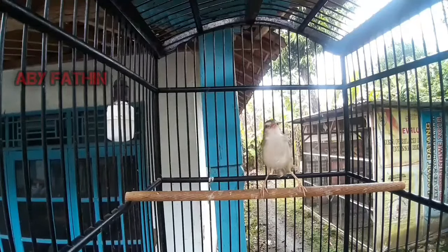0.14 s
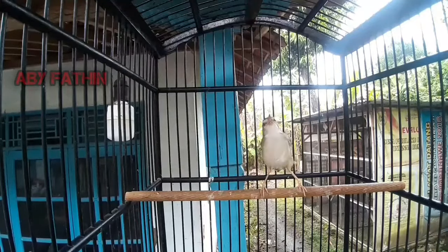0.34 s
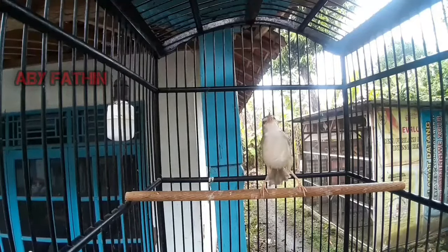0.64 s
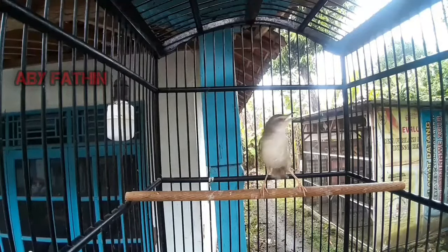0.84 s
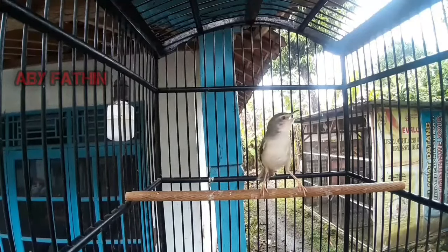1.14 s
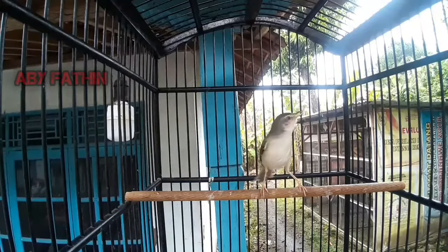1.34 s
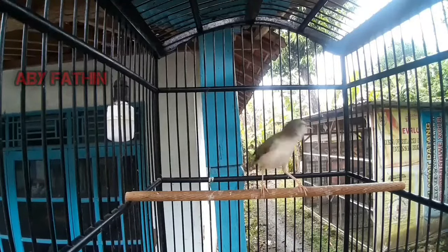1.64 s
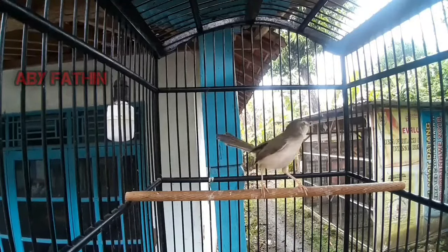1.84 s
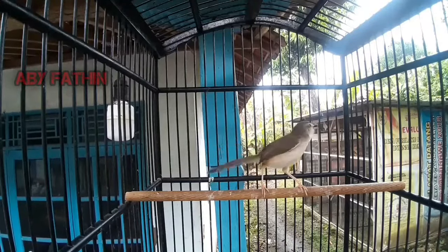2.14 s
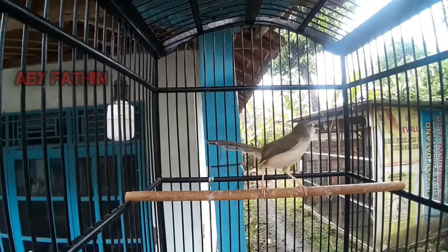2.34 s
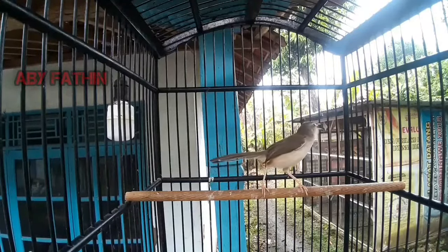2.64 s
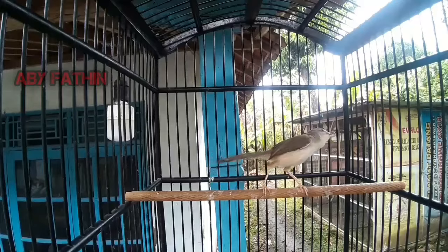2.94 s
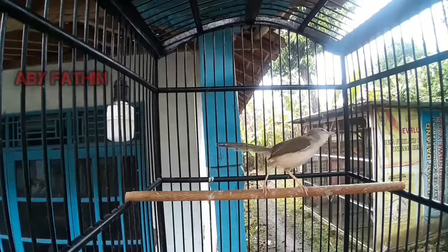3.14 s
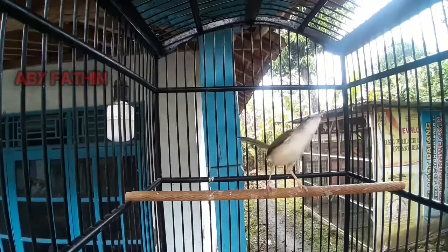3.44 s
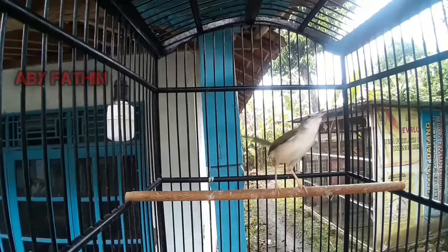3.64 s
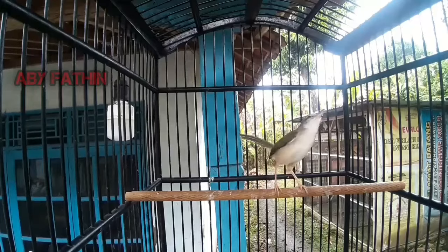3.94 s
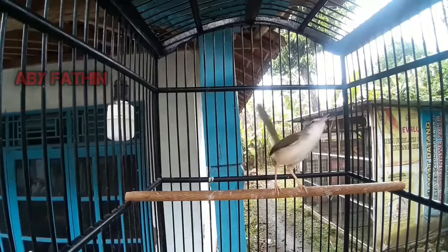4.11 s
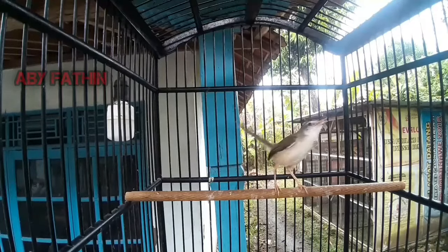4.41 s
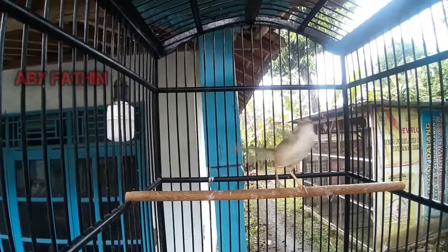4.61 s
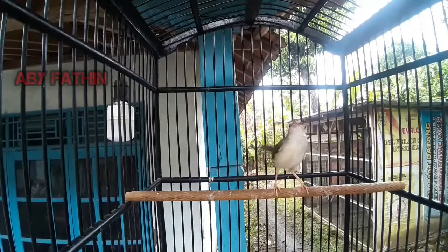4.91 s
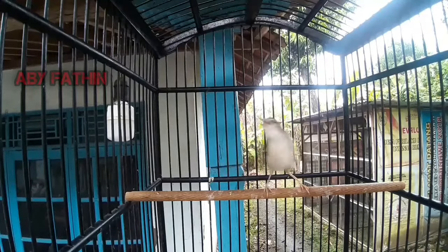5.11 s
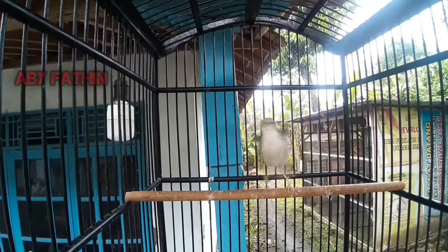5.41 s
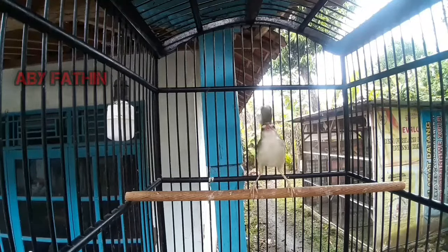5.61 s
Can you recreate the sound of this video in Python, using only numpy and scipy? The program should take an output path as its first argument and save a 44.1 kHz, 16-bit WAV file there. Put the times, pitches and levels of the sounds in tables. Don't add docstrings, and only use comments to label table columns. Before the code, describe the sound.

A small bird in a wire cage, an arm's length from a stereo microphone, repeats short dry rattles: three to five hard clicks joined by tiny arched whistles and beak hiss. About six or seven calls come each second. They soften towards three seconds, pause briefly while a faint distant bird whistles, then resume and grow strong again. Light yard echo and very low traffic rumble lie behind; cage wire tings faintly near the end.

```python
import sys
import numpy as np
from scipy import signal
from scipy.fft import rfft, irfft
from scipy.io import wavfile
from scipy.ndimage import uniform_filter1d

SR = 44100
rng = np.random.default_rng(int(sys.argv[2]) if len(sys.argv) > 2 else 0)


def generate_wav(sig):
    pcm = np.round(np.clip(np.atleast_2d(sig).T, -1, 1) * 32767).astype(np.int16)
    wavfile.write(sys.argv[1], SR, pcm)


def how_loud(loudness_db):
    steps = np.asarray(loudness_db, float) / 20
    return 10 ** steps


N = 254016
LEAD = 2048
CALL = 7168

# first_click_s, last_full_click_s, closing_click_s,
# click_effort_db, closing_click_over_effort_db
CALLS = [(-.024, .0378, .066, -13.8, -28), (.135, .1769, .203, -14.2, -2),
         (.2977, .3632, .3826, -14.5, -5), (.4684, .4858, .5095, -14.6, -1),
         (.5936, .6324, .6529, -15.3, -10), (.7537, .792, .8166, -12.5, -2),
         (.9158, .9538, .9784, -15.3, -1), (1.0782, 1.1427, 1.1628, -16.4, -19),
         (1.2451, 1.3072, 1.333, -14.5, -30), (1.4472, 1.5108, 1.5285, -17.6, -9),
         (1.6183, 1.6799, 1.6985, -15.8, -12), (1.7734, 1.8131, 1.8343, -20, -11),
         (1.9214, 1.9581, 1.9799, -20.8, -6), (2.06, 2.0985, 2.1233, -22.5, -4),
         (2.2118, 2.2506, 2.276, -20.5, -5), (2.3622, 2.402, 2.4248, -24, -5),
         (2.5015, 2.539, 2.5634, -22.5, -4), (2.6575, 2.6968, 2.7207, -22.1, -14),
         (2.7949, 2.838, 2.8582, -26.5, -7), (2.9481, 3.0131, 3.0314, -26, -6),
         (3.337, 3.3951, 3.414, -18, -9), (3.5968, 3.6788, 3.6989, -17.5, -18),
              (3.9821, 4.0394, 4.0576, -18.4, -15), (4.149, 4.209, 4.2287, -17.8, -8),
              (4.3179, 4.3554, 4.3778, -18.6, -10), (4.4618, 4.5002, 4.5232, -18.2, -10),
              (4.6086, 4.6463, 4.671, -14.3, -5), (4.7532, 4.7917, 4.8162, -13.8, -7),
              (4.9073, 4.9704, 4.9882, -13.9, -17), (5.065, 5.1029, 5.1267, -11.9, -5),
              (5.2279, 5.2871, 5.311, -14.7, -12), (5.4125, 5.4719, 5.4893, -12.8, -20),
              (5.5667, 5.6293, 5.6512, -14.8, -5), (5.738, 5.7558, 5.777, -21, -8)]
# start_s, top_pitch_hz, whistle_over_click_db, second_partial_over_mean_arch_db, left_lag_us
HEAD_TURNS = [(0, 2841, -13, 4.5, -42), (.3, 2782, -12.5, 8, -37), (0.469, 2918, -15, 4.5, -49),
              (0.601, 2733, -12, 9, -37), (.8, 2800, -14.5, 7, -37), (0.919, 2747, -13.5, 6, 28),
              (1.5, 2780, -10.5, 5, 18), (1.8, 2755, -12, 3, 65.5), (2.362, 2840, -9.5, 4, 66.5),
              (2.55, 2815, -14, -0.5, 72), (2.8, 2610, -10.5, 7, 75), (2.951, 2720, -11, 6, 89.5),
              (3.34, 2704, -11, 2.5, 53), (4.46, 2690, -7.5, -0.5, 46.5), (4.75, 2773, -12.5, 4.5, 19),
              (5.07, 2706, -13, 7, -4), (5.23, 2742, -14, 8, -43), (5.76, 2742, -8.5, 6, -52)]
# gap_to_next_click_ms, click_db,
# arch_top_ms, top_pitch_share, arch_db, end_pitch_share_of_top
CYCLES = [
    (17.55, -7, 9.8, .87, -7.5, .81),
    (20.58, 1, 12.26, 0.96, -1.5, .77),
    (24.17, 1, 14.12, 0.99, -3, .75),
    (23.75, 1, 12.9, 0.97, -5.5, .74),
    (24.5, -0.5, 12.63, 0.97, -13.5, .74),
]
# pitch_hz, level_db
TRACT = [(1500, -1.5), (2200, 0), (2800, 2.5), (4300, 4.5), (5000, -1.5), (5600, 4.5), (7000, -6.5),
         (9000, -3.5), (14000, -9)]
OVERTONES = [-6, -29.5, -16.5, -24.5]
# pitch_hz, level_db
BREATH = [(1000, -18.5), (1350, -8), (1700, -12.5), (3300, 1), (4200, 5), (5900, -10.5), (8000, -8),
          (10500, -14), (12500, -20.5), (14500, -29), (15800, -40.5)]
# pitch_hz, level_db
LOW_END = [(600, -36.5), (1250, -8), (1900, -1.5)]
# pitch_hz, level_db_per_us of lag
TURNED_AWAY = [(3000, 0), (4300, 0.0121), (5500, 0.1061), (6500, -0.0004)]
# pitch_hz, t60_s
YARD_DECAY = [(2500, 0.47), (4500, 0.4), (8000, 0.88), (14000, 0.9)]
# peak_s, ring_hz, level_db, swell_ms
WIRE = [(5.66, 9920, -45, 5.5), (5.68, 7840, -35.5, 7.8), (5.685, 10070, -54, 6.8),
        (5.694, 8850, -51.5, 5.5), (5.701, 10300, -54, 5), (5.711, 8100, -50, 6), (5.724, 8980, -42.5, 13),
        (5.742, 7250, -45, 3.8)]
# peak_s, centre_hz, level_db, length_ms
THUDS = [(.16, 653, -62, 32), (2.45, 630, -71.5, 120), (3.17, 75, -53.5, 40), (4.18, 650, -62.5, 65),
         (4.63, 800, -67.5, 97), (5.27, 66.4, -63, 58)]
# start_s, length_s, start_hz, end_hz, level_db, waver_hz
FAR_BIRD = [(3.115, .07, 4560, 4400, -54, 25), (3.185, .05, 4420, 4330, -58, 40),
            (3.19, .11, 4250, 4000, -65, 220), (3.535, .04, 2330, 2380, -71, 20),
            (3.25, .07, 2350, 2330, -72, 40)]
# pitch_hz, level_db per Hz
FLOOR = [(30, -58), (48, -21), (70, -3.5), (110, 0.5), (250, -8), (500, -16), (900, -27), (2200, -27),
         (5000, -36), (15000, -41.5)]
# pitch_hz, likeness (0 to 1)
SAME = [(30, 1), (125, 0.92), (250, 0.84), (500, 0.3), (1500, .2), (9000, .1)]
# time_s, level_db
RUMBLE = [(0, -1), (3.7, -0.5), (5, 2.5), (5.76, 2)]

FLOOR_DB = -60
WHOLE_MS, CUT_MS = 23.2, 20.5
CUT_SAG, CUT_PITCH, CUT_DB = 0.85, 0.97, -1.5
FADED_DB, FADED_CUT = -14, 0.63
SCATTER_DB, SCATTER_PITCH = .9, .012
LINGER_S = 0.00435
PAN_DB, PAN_DB_PER_US = 1.1, .022
PATCHY_DB, PATCHY_HZ = 5.5, 8000
TRAY_S, TRAY_DB = .0032, -20


def evened(x):
    return x / np.sqrt(np.mean(x ** 2) + 1e-20)


def read(points, hz):
    f, value = np.transpose(points)
    return np.interp(np.log(hz + 1), np.log(f + 1), value)


def add(mix, s, sound):
    part = mix[..., round(s * SR) + LEAD:][..., :sound.shape[-1]]
    part += sound[..., :part.shape[-1]]


def coloured(x, points):
    hz = np.fft.rfftfreq(len(x), 1 / SR)
    return irfft(rfft(x) * how_loud(read(points, hz)), len(x))


def bump(t, width):
    return np.exp(-.5 * (t / width) ** 2)


def rattle(rows, bright_db, pan_db, lag_us):
    t = rows[0][0] - .02 + np.arange(CALL) / SR
    voice = sum(click(t - row[0], row[1], 4300 if k else 4150) for k, row in enumerate(rows))
    air = sum(how_loud(row[1] - 16.5) * bump(t - row[0], .0022) for row in rows)
    second_db = bright_db + np.mean([row[4] for row in rows[:-1]])
    for k, (row, after) in enumerate(zip(rows, rows[1:])):
        start = round((row[0] - t[0]) * SR)
        span = slice(start, start + CALL // 4)
        end = after[0] + LINGER_S * (len(after) == 2)
        over_db = second_db - row[4] - 28 * max(row[5] - .87, 0) + (.4 if k else -4.2)
        tone, effort = arch(t[span], row[0], end, *row[2:], over_db, gap=.0042 if k else .0063)
        voice[span] += tone
        air[span] += how_loud(-6.5) * effort
    shared, left, right = rng.standard_normal((3, CALL))
    puff = evened(coloured(shared, [(2400, -15), (3900, -0.5), (5200, -11), (9000, -48.5)]))
    voice += how_loud(rows[1][1] - 21) * bump(t - rows[0][0] + 0.0069, 0.0041) * puff
    gusts = evened(uniform_filter1d(rng.standard_normal(CALL), 90))
    air *= how_loud(3.5 * gusts - 1.2 + 0.037 * max(lag_us, 0))
    breath = np.array([evened(coloured(shared + 1.3 * own, BREATH)) for own in (left, right)])
    return t[0], at_ports(voice + air * breath, pan_db, lag_us)


def cycles(first, last, close, effort_db, close_db, top_hz, whistle_db):
    reach = np.cumsum([0] + [c[0] / 1000 for c in CYCLES[:-1]])
    count = np.argmin(abs(reach - (last - first)))
    stretch = (last - first) / reach[count]
    shortness = (WHOLE_MS - 1000 * (close - last)) / (WHOLE_MS - CUT_MS)
    cut = np.clip(shortness, FADED_CUT * (close_db <= FADED_DB), 1)
    chance, rows = rng.standard_normal((len(CYCLES), 3)), []
    for k, (_, click_db, top_ms, share, db, sag) in enumerate(CYCLES[:count + 1]):
        broken = cut * (k == count)
        pitch = top_hz * share * (1 - broken * (1 - CUT_PITCH) + SCATTER_PITCH * chance[k, 1])
        rows.append((first + stretch * reach[k],
                     effort_db + click_db + SCATTER_DB * chance[k, 0],
                     top_ms * stretch,
                     pitch,
                     effort_db + whistle_db + db + broken * CUT_DB + SCATTER_DB * chance[k, 2],
                     sag + broken * (CUT_SAG - sag)))
    return rows + [(close, effort_db + close_db)]


def click(t, db, hz):
    hz = hz * (1 + .025 * rng.standard_normal())
    phase = 2 * np.pi * rng.random()
    ring = bump(t, 0.00094) * np.sin(2 * np.pi * (hz * t + 193000.0 * t ** 2) + phase)
    sweep_turns = 5600 * (t + 0.00084) + 1245000.0 * (t + 0.000797) ** 2
    sweep = bump(t + 0.0017, 0.00047) * np.sin(2 * np.pi * sweep_turns)
    return np.sqrt(2) * how_loud(db) * (ring + how_loud(-21.5) * sweep)


def arch(t, click_s, end, top_ms, top_hz, db, sag, bright_db, gap):
    top, start, stop = click_s + top_ms / 1000, click_s + gap, end - .002
    rise = np.clip((top - t) / max(top - start, .002), 0, 1.3)
    fall = np.clip((t - top) / max(stop - top - .0015, .002), 0, 1.05)
    linger = np.clip((sag - .85) / 0.2, 0, 1)
    slump = 0.21 * linger * np.clip((t - stop + 0.00033) / 0.0046, 0, 1)
    stop += 0.0022 * linger
    flutter = evened(uniform_filter1d(rng.standard_normal((len(t), 2)), 40, axis=0))
    droop = (1.02 - sag) * fall ** 1.65 + slump
    hz = top_hz * (1 - 0.26 * rise ** 1.733 - droop + .01 * flutter[:, 0])
    gate = np.clip((t - start) / 0.001, 0, 1) * np.clip((stop - t) / 0.0054 + .5, 0, 1)
    effort = gate * how_loud(db - 7.5 * rise ** 1.8 - 1.07 * fall ** 2.1 - 150 * slump)
    turn = 2 * np.pi * (np.cumsum(hz) / SR + rng.random())
    tone = how_loud(read(TRACT, hz) - read(TRACT, top_hz)) * np.sin(turn)
    for k, over_db in enumerate([bright_db] + OVERTONES, 2):
        partial_db = over_db + read(TRACT, k * hz) + 2.62 * flutter[:, 1]
        tone += how_loud(partial_db) * np.sin(k * turn + k)
    return np.sqrt(2) * effort * tone, effort


def at_ports(sound, pan_db, lag_us):
    hz, side = np.fft.rfftfreq(CALL, 1 / SR), np.array([[.5], [-.5]])
    bands = evened(uniform_filter1d(rng.standard_normal(len(hz)), size=120))
    patchy_db = PATCHY_DB * bands * np.clip(hz / PATCHY_HZ - 1, 0, .3) / 0.4
    shade_db = read(LOW_END, hz) + read(TURNED_AWAY, hz) * max(lag_us, 0) + patchy_db
    level_db = side * pan_db * (hz < PATCHY_HZ) + shade_db
    delay = np.exp(-2j * np.pi * np.minimum(hz, 6000) * side * lag_us * 1e-6)
    ports = irfft(rfft(sound) * how_loud(level_db) * delay, CALL)
    return ports / np.cos(np.pi * 4200 * lag_us * 1e-6) ** 0.88


def yard(x, near_db):
    t = np.arange(1024) / SR
    near = rng.standard_normal((2, 1024)) * how_loud(-60 * t / 0.03) * (t > .0012)
    taps, slots = np.zeros((2, SR)), np.arange(500, SR - 20, 20)
    at = slots + rng.integers(0, 20, (2, len(slots)))
    np.put_along_axis(taps, at, rng.choice([-1., 1.], at.shape), 1)
    hz, t, z = signal.stft(taps, SR, nperseg=256)
    z = z * how_loud(-60 * t / read(YARD_DECAY, hz)[:, None])
    tail = signal.istft(z, SR, nperseg=256)[1][:, :SR // 2]
    far = signal.oaconvolve(x, how_loud(-21.5) * tail / np.linalg.norm(tail[0]), axes=1)
    close = signal.oaconvolve(x * how_loud(near_db), near / np.linalg.norm(near[0]), axes=1)
    tray = how_loud(TRAY_DB) * np.roll(x, round(TRAY_S * SR), axis=1)
    return far[:, :x.shape[1]] + close[:, :x.shape[1]] + tray


def cage_wire(out):
    t = np.arange(-3000, 3000) / SR
    for s, hz, db, ms in WIRE:
        scrape = coloured(rng.standard_normal(len(t)), [(5500, -15), (7500, 7), (12500, -15), (15500, -23)])
        ring = how_loud(db + 2) * bump(t, ms / 1900) * np.sin(2 * np.pi * hz * t)
        add(out, s + t[0], ring + how_loud(-54) * bump(t, 0.0085) * evened(scrape))


def thuds(out):
    t = np.arange(-3000, 3000) / SR
    for s, hz, db, ms in THUDS:
        band = [(hz / 3, -24), (hz / 1.5, 0), (hz * 1.3, -2), (hz * 3, -50)]
        noise = coloured(rng.standard_normal(len(t)), band)
        add(out, s + t[0], how_loud(db) * bump(t, ms / 2000) * evened(noise))


def far_bird(out):
    for s, length, hz0, hz1, db, waver_hz in FAR_BIRD:
        hz = np.linspace(hz0, hz1, round(length * SR))
        waver = evened(uniform_filter1d(rng.standard_normal((CALL, 2)), 150, axis=0))[:len(hz)]
        turn = 2 * np.pi * np.cumsum(hz + waver_hz * waver[:, 0]) / SR
        tone = np.sin(turn) + how_loud(-28.5) * np.sin(2 * turn)
        add(out, s, how_loud(db + 4 + 1.4 * waver[:, 1]) * tone * signal.windows.tukey(len(hz), .4))


def traffic_floor():
    frames, hz = N // 256 + 5, np.fft.rfftfreq(1024, 1 / SR)
    a, b, c, d, patches = rng.standard_normal((frames, 513, 5)).T
    patches = evened(uniform_filter1d(uniform_filter1d(patches, 8, axis=0), 14, axis=1))
    swell_db = np.interp(np.arange(frames) * 256 / SR, *np.transpose(RUMBLE))
    same, left = np.clip(read(SAME, hz), -1, 1)[:, None], a + 1j * b
    z = np.array([left, same * left + np.sqrt(1 - same ** 2) * (c + 1j * d)])
    patch_db = (0.3 + 0.73 * bump(np.log((hz + 1) / 700), .45))[:, None] * patches
    traffic_db = (hz < 900)[:, None] * (swell_db - swell_db.mean())
    z *= how_loud(read(FLOOR, hz)[:, None] + patch_db + traffic_db)
    return how_loud(FLOOR_DB) * evened(signal.istft(z, nperseg=1024, noverlap=768)[1][:, :N])


def scene():
    bird, others = np.zeros((2, N + LEAD)), np.zeros(N + LEAD)
    s, *pose = np.transpose(HEAD_TURNS)
    for call in CALLS:
        top_hz, whistle_db, bright_db, lag_us = (np.interp(call[0], s, column) for column in pose)
        pan_db = PAN_DB + PAN_DB_PER_US * max(-lag_us, 0)
        add(bird, *rattle(cycles(*call, top_hz, whistle_db), bright_db, pan_db, lag_us))
    cage_wire(others)
    thuds(others)
    far_bird(others)
    near_db = -10.5 + 0.017 * np.interp((np.arange(N + LEAD) - LEAD) / SR + .03, s, pose[-1])
    echo = yard(bird + how_loud(14) * others, near_db)
    return (bird + others + echo)[:, LEAD:] + traffic_floor()


def low_pass(x):
    return signal.sosfilt(signal.butter(12, 15850, fs=SR, output="sos"), x)


def record(dry):
    dull = signal.oaconvolve(dry, signal.firwin(255, 15800, fs=SR)[None], "same")
    return low_pass(dull)


dry = scene()
out = record(dry)
generate_wav(out)
```